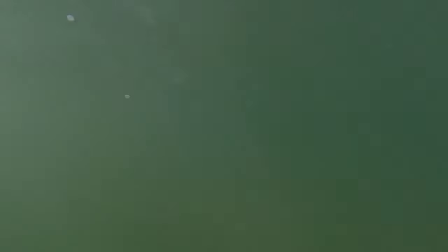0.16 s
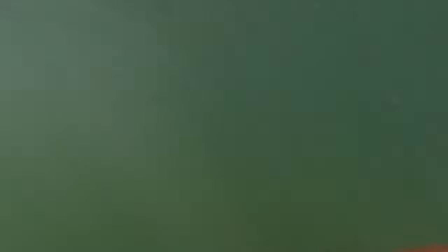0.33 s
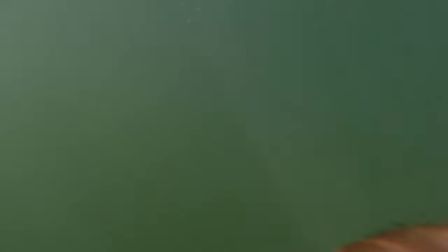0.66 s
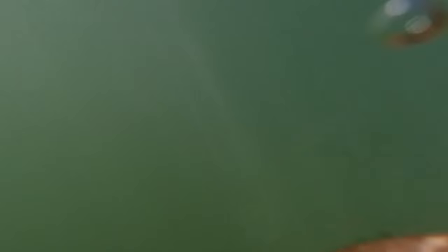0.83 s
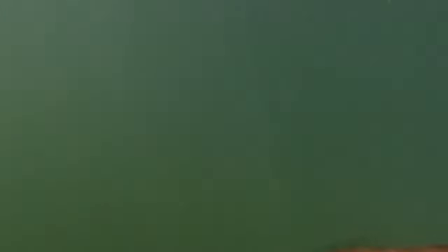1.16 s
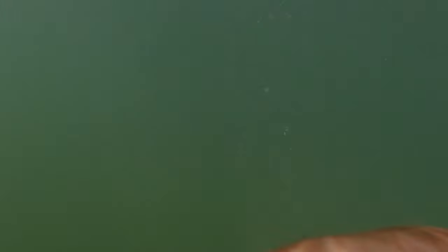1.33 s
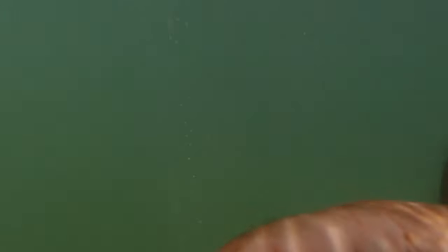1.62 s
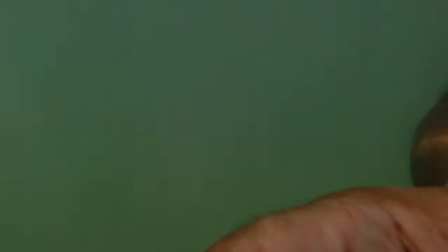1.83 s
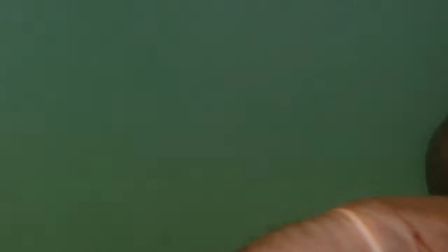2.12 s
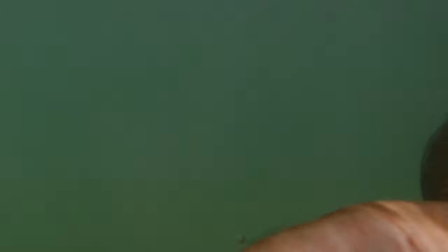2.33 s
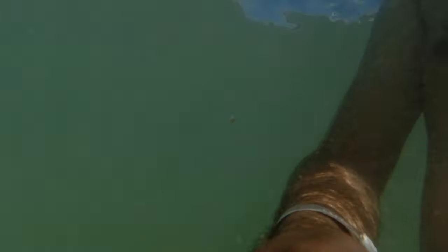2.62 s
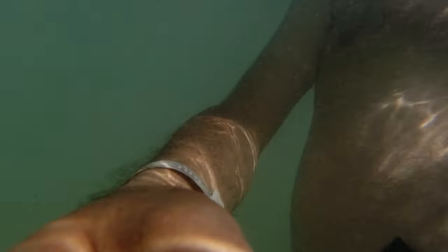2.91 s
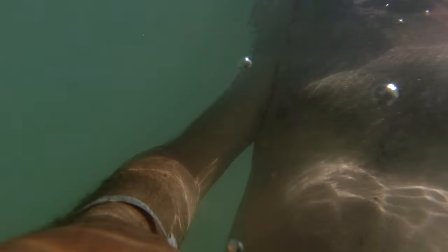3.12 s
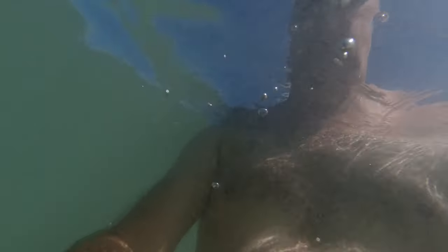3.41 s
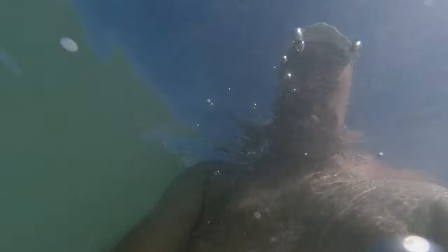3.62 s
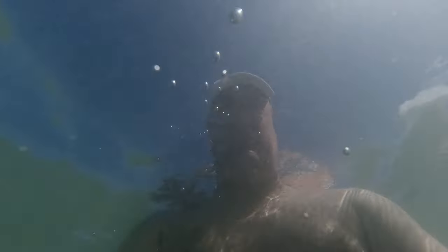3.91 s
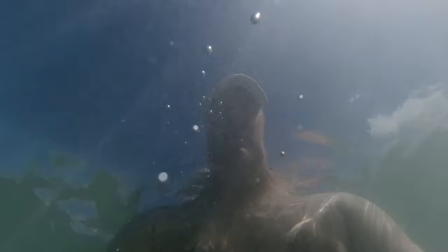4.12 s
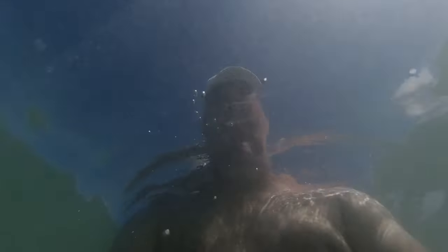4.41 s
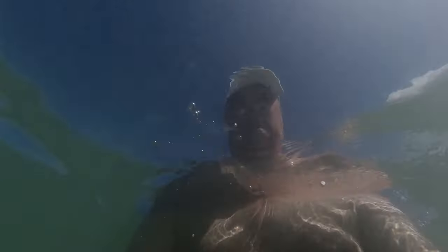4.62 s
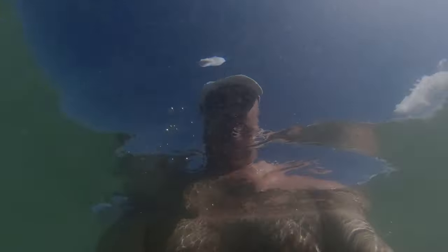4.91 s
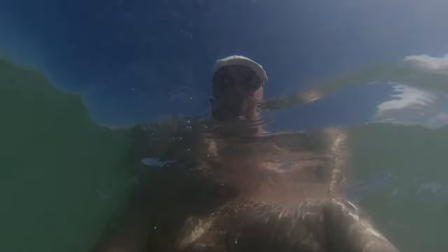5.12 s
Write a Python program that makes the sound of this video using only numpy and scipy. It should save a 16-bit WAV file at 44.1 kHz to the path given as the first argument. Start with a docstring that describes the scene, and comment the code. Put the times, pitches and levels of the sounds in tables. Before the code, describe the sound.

Muffled stereo sound just below the water surface. Rounded air bubbles pop and gurgle close to the camera case, alone or in quick clusters, amid uneven sloshing and deep turbulent rumble. Faint clicks and fine fizz brush the casing. The busiest burst comes past the middle; afterwards only weak trickles and a few soft plops remain.

```python
"""Air pockets break off a bather's hand and a waterproof camera case just under the surface and ring as bubbles:
damped sines near each pocket's own pitch, alone or in gushes, spurts and faint trickles.
Banded noise makes the water slosh and rumble round the case as it is turned over; fine bubbles fizz against it,
and short noise kicks through resonances make it tick from small knocks and bursting bubbles.
Two sound ports on the case give the left and right channels."""
import sys
import numpy as np
from scipy import signal
from scipy.io import wavfile
from scipy.ndimage import uniform_filter1d

SR = 44100
rng = np.random.default_rng(int(sys.argv[2]) if len(sys.argv) > 2 else 0)


def file_out(sig):
    """Save sig as 16-bit WAV at sys.argv[1]."""
    # one column per channel
    cols = np.atleast_2d(sig).T
    # limit, then scale
    lim = np.clip(cols, -1, 1)
    pcm = np.round(lim * 32767).astype(np.int16)
    wavfile.write(sys.argv[1], SR, pcm)


N = 232186
TIME = np.arange(N) / SR

# air pockets breaking away: (time near the peak [s], pitch [Hz], peak level [dB], decay time [ms],
# lag of the right port [ms])
BUBBLES = [(0.0275, 480, -13.5, 2.3, 0.43), (0.028, 840, -18, 2.6, 0.42), (0.082, 550, -12, 1.6, 0.5),
           (0.082, 1061.0, -26.0, 2.6, 0.67), (0.197, 600.0, -27, 2.2, 0.45), (0.198, 1000, -23, 5.0, 0.66),
           (0.25, 950, -35.5, 5.0, 0.4), (0.597, 470, -34, 5, 0.3), (1.297, 610.0, -22.0, 3.0, 0.3),
           (1.305, 610, -17.5, 7, 0.3), (1.337, 534.0, -30.0, 1.5, 0.5), (1.655, 632.0, -15.0, 2.6, -0.33),
           (1.655, 1201.0, -22.0, 2.0, 0.27), (1.977, 265.0, -21.5, 5.4, -1.5),
           (1.978, 1018.0, -24.5, 2.6, -0.21), (1.978, 1417.0, -34.0, 3.3, -0.07),
           (1.979, 659.0, -19.5, 2.6, 0.86), (2.008, 122.0, -26.5, 22.0, 2.0),
           (2.166, 440, -20.5, 3.3, 0.17), (2.184, 520, -23.5, 5, 0.23), (2.212, 254.0, -30.5, 5.4, -0.18),
           (2.443, 493.0, -29.5, 1.5, 0.32), (2.639, 1150, -27.0, 2.5, 0.34), (2.659, 500, -28, 5, 0.1),
           (2.676, 249.0, -24.5, 4.2, -0.32), (2.7225, 700, -22, 1.4, 0.16),
           (2.965, 619.0, -17.5, 1.5, 0.11), (2.965, 1933.0, -28.5, 2.4, 0.17),
           (2.98, 271.0, -18, 3.6, -0.51), (2.981, 701.0, -14.5, 3.3, 0.23), (3.015, 370, -23.5, 3.5, 0.2),
           (3.036, 1590, -48.0, 14.0, 0.1), (3.199, 255.0, -17.5, 8, 0.22), (3.253, 815, -24.5, 2.6, 0.0),
           (3.263, 855.0, -29.5, 10, -0.01), (3.278, 870, -23.5, 3.6, 0.38), (3.313, 1350, -35, 8, 0.18),
           (3.345, 710, -31, 10, -0.08), (3.345, 282.0, -17.5, 6, 0.1), (3.4075, 2150, -35, 2.2, 0.1),
           (3.4235, 271.0, -11.5, 4.0, 0.11), (3.424, 1252.0, -25.0, 1.5, -0.05),
           (3.435, 319.0, -9.5, 1.5, 1.38), (3.435, 950, -25, 2, 0.1), (3.44, 90.0, -19, 16.0, 2.0),
           (3.453, 900, -15.5, 1.0, -0.16), (3.454, 1400, -28, 2.5, -0.1), (3.456, 1110, -20.5, 4, -0.16),
           (3.461, 401.0, -17.5, 2.6, 0.38), (3.501, 313.0, -22.0, 5.5, 0.21),
           (3.515, 976.0, -34, 20, -0.02), (3.576, 347.0, -26.5, 7.0, -0.01),
           (3.578, 1025, -27.0, 6, -0.08), (3.67, 454.0, -20.0, 3.3, 0.02),
           (3.674, 607.0, -18.0, 5.4, -0.53), (3.682, 362.0, -21.0, 9.0, -0.04),
           (3.69, 1010, -25.5, 7.0, -0.06), (3.862, 590, -28, 6, 0.38), (3.881, 450, -23.5, 6, 0.59),
           (3.8935, 270, -21, 1.8, -0.75), (4.414, 362.0, -31.5, 1.5, 0.11),
           (4.528, 276.0, -32.5, 7.0, -0.13), (5.1355, 345, -19.5, 2.4, -0.04),
           (5.136, 620.0, -23.5, 2.6, -0.64), (5.15, 350, -23.5, 2.8, 0.0), (5.1505, 560, -25, 1.8, -0.1)]
# short ticks on the case, from small knocks or bursting bubbles:
# (time [s], peak level of the ringing part [dB], ring frequency [Hz])
TICKS = [(0.026, -47, 1610), (0.741, -54.5, 3100), (0.7712, -54, 3330), (1.6527, -49, 2510),
         (1.694, -55, 2970), (1.8985, -53, 3300), (1.975, -33.5, 3200), (2.0912, -44.5, 2210),
         (2.321, -44, 3200), (2.627, -47, 3190), (2.96, -31, 3000), (2.9758, -29.5, 3446),
         (3.345, -41, 3050), (3.4198, -34, 2298), (3.433, -33.5, 3137), (3.462, -41, 3060),
         (3.669, -36.5, 1900), (4.046, -50.5, 2850), (4.2626, -58, 3240), (4.468, -56, 2760),
         (4.8957, -54.5, 3570), (5.176, -49, 2980)]


def from_db(db):
    """Amplitude ratio from the logarithmic level in decibels."""
    return 10 ** (np.asarray(db) / 20)


def rms_one(x):
    """Normalisation to unit root-mean-square amplitude."""
    return x / np.sqrt(np.mean(x ** 2) + 1e-20)


def in_time(points):
    """Linear interpolation of a curve over time."""
    s, value = np.transpose(points)
    return np.interp(TIME, s, value)


def at_hz(points, hz):
    """Interpolation of a spectrum on a logarithmic frequency axis."""
    f, value = np.transpose(points)
    return np.interp(np.log(hz), np.log(f), value)


def drift(rate_hz):
    """Random fluctuation: white noise through two equal real poles, with spread 1."""
    step = 40   # samples between the points of the slow signal
    pole = np.exp(-2 * np.pi * rate_hz * step / SR)
    kicks = rng.standard_normal(N // step + 2002)
    slow = signal.lfilter([1], [1, -2 * pole, pole * pole], kicks)[2000:]   # skip the settling
    return np.interp(np.arange(N) / step, np.arange(len(slow)), rms_one(slow))


def butter(x, hz, kind, order=2):
    """Causal Butterworth filter: a maximally flat passband."""
    sos = signal.butter(order, np.clip(hz, 8, .45 * SR), kind, fs=SR, output="sos")
    return signal.sosfilt(sos, x + 1e-18)


def resonate(x, hz, width_hz):
    """Damped resonance as a pole pair, with about unit gain at its peak."""
    r = np.exp(-np.pi * width_hz / SR)
    zeros = np.array([1, 0, -1]) * (1 - r * r) / 2
    poles = [1, -2 * r * np.cos(2 * np.pi * hz / SR), r * r]
    return signal.lfilter(zeros, poles, x + 1e-18)


def grains(per_s, spread_db):
    """Random impulse process: two unrelated trains of kicks, a few much larger than the rest."""
    size_db = spread_db * np.minimum(rng.exponential(1, (2, N)), 4)
    kicks = from_db(size_db) * rng.choice([-1, 1], (2, N))
    return rms_one(kicks * (rng.random((2, N)) < per_s / SR))


def coloured(drives, spectrum, low_hz, count, patchy_db, patchy_rate):
    """Third-octave synthesis: bands surge independently, with set coherence between ports; rms 1."""
    # how alike the two ports hear the water: (frequency [Hz], correlation [-1 to 1])
    likeness = [(30, 0.35), (90, -0.36), (220, 0.63), (450, -0.16), (750, -0.014), (1400, 0.16),
                (3000, -0.026)]
    out = 0
    for k in range(count):
        hz = low_hz * 2 ** (k / 3)
        edges_hz = hz * 2 ** (np.array([-1, 1]) / 6)
        mid, side = butter(drives[k % len(drives)], edges_hz, "band")
        alike = np.clip(at_hz(likeness, hz), -1, 1)
        gain = from_db(at_hz(spectrum, hz) + patchy_db * drift(patchy_rate))
        both_ports = np.sqrt(1 + alike) * mid + np.sqrt(1 - alike) * side * [[1], [-1]]
        out = out + gain * both_ports
    return rms_one(out)


def ports(pair, lag=4):
    """Propagation delay: the right port hears the left signal a few samples late, slightly changed."""
    return np.array([pair[0], .85 * np.roll(pair[0], lag) + .5 * pair[1]])


def add_bubble(out, s, hz, db, swell_ms, decay_ms, lag_ms, wobble=0.027, rise_per_cycle=0.0024):
    """Damped oscillator: an air pocket swells into ringing, wavers, creeps up in pitch and fades."""
    tail_db, tail_cycles = -33, 24   # faint after-ring: level, decay time in cycles (500 Hz or above)
    tail_ms = 1000 * tail_cycles / max(hz, 500)
    reach_s = np.array([-swell_ms, max(decay_ms, tail_ms)]) / 100   # ten time constants each way
    first, last = np.clip((SR * (s + reach_s)).astype(int), 0, N)
    if last - first < 2:
        return
    t = TIME[first:last] - s
    # smooth joint of an exponential rise and an exponential fall
    blip, tail = (np.exp(-np.logaddexp(-t * 1000 / swell_ms, t * 1000 / fall_ms))
                  for fall_ms in (decay_ms, tail_ms))
    envelope = blip + from_db(tail_db) * tail
    waver = wobble * np.sin(2 * np.pi * (t * hz / 10 + rng.random()))   # slow shape oscillation
    pitch = hz * np.exp(rise_per_cycle * 10 * np.tanh(t * hz / 10) + waver)
    tone = np.sin(2 * np.pi * (np.cumsum(pitch) / SR + rng.random()))
    ring = from_db(db) * envelope / envelope.max() * tone
    for port, sign in enumerate((1, -1)):   # half the lag early on the left, half late on the right
        out[port, first:last] += np.interp(t + sign * lag_ms / 2000, t, ring, left=0, right=0)


def wakes(events, attack_s, release_s):
    """Power addition: the disturbance round each event (s, dB) builds up and dies exponentially."""
    power = np.zeros(N)
    for s, db in events:
        near = slice(max(int(s * SR) - SR // 10, 0), int(s * SR) + SR // 4)
        t = TIME[near] - s
        shape = np.exp(-np.maximum(-t / attack_s, t / release_s))
        power[near] += (from_db(db) * shape) ** 2
    return power


def disturbed(curve, power):
    """Energy sum of a slow level curve and the wakes, as a level in dB."""
    return 10 * np.log10(from_db(in_time(curve)) ** 2 + power)


def wake_strengths():
    """Source strength of each bubble's wake: bubbles pitched below 600 Hz stir up less."""
    return [(s, db + 30 * np.log10(min(hz / 600, 1))) for s, hz, db, *rest in BUBBLES]


def stir_level():
    """Superposed agitation: slow stirring plus a brief wake of slosh round each large bubble."""
    # stirring between the large bubbles: (time [s], slosh level before trim and case [dB])
    stirring = [(0.0, -51), (0.37, -52), (0.52, -41), (0.68, -40), (0.73, -44.5), (1.11, -48), (1.35, -38),
                (1.49, -51.5), (1.63, -39), (1.81, -51.5), (2.09, -36), (2.21, -38.5), (2.28, -59),
                (2.49, -60), (2.56, -40), (2.66, -32), (2.75, -44), (2.94, -40.5), (3.01, -30.5),
                (3.15, -35), (3.45, -36.5), (3.8, -44.5), (4.23, -52.5), (5.26, -52)]
    wake_db = -19.5   # relative to the bubble's wake strength
    stirs = [(s, db + wake_db) for s, db in wake_strengths()]
    return disturbed(stirring, wakes(stirs, attack_s=.003, release_s=.02))


def froth_level():
    """Superposed agitation: slow froth plus the fizz that bubbles and ticks shake off the case."""
    # fine bubbles on the case: (time [s], fizz level before trim and case [dB])
    froth = [(0.0, -96.5), (0.63, -79.5), (1.53, -84.5), (1.59, -71.5), (1.79, -88), (2.11, -61),
             (2.24, -89), (2.44, -69.5), (2.5, -86), (2.57, -72), (2.73, -76.5), (3.11, -63.5), (3.64, -80),
             (4.64, -83.5), (5.26, -73.5)]
    bubble_db, tick_db = -71.5, -17   # relative to the wake strength and to the tick's peak
    shakes = [(s, db + bubble_db) for s, db in wake_strengths()]
    shakes += [(s, db + tick_db) for s, db, hz in TICKS]
    return disturbed(froth, wakes(shakes, attack_s=0.0067, release_s=0.0043))


def case(x):
    """Resonant filtering: each resonance of the case lifts, and each hollow cuts, its own band."""
    # resonances and the hollows between them: (centre [Hz], width [Hz], gain [dB])
    modes = [(249, 51, 7), (313.5, 86, -6.5), (437, 20, 3), (886, 220, -12), (1200, 440, 1.5),
             (1910, 1000, -6.5), (2244, 32, 9), (2660, 350, -6), (2820, 110, 1.5)]
    for hz, width_hz, db in modes:
        half = np.pi * width_hz / SR
        root = from_db(db / 2)
        turn = -2 * np.cos(2 * np.pi * hz / SR)
        zeros = [1 + half * root, turn, 1 - half * root]
        poles = [1 + half / root, turn, 1 - half / root]
        x = signal.lfilter(zeros, poles, x)
    return x


def hiss(level_db=-99):
    """White noise: a faint, flat spectrum, independent in the two channels."""
    return from_db(level_db) * rng.standard_normal((2, N))


def rumble(trim_db=-6.5):
    """Turbulent pressure: eddies press partly separately on the ports, with the strength of the flow."""
    # flow round the case as it is moved: (time [s], rumble level before trim [dB])
    flow = [(0.0, -39.5), (0.52, -36), (0.75, -40.5), (1.12, -38), (1.2, -26), (1.51, -29), (2.02, -26),
            (2.4, -37), (2.56, -26), (2.72, -25), (2.92, -18), (3.3, -23), (3.44, -14), (3.54, -29),
            (3.68, -23), (4.22, -38.5), (4.41, -33), (5.2, -34), (5.26, -37.5)]
    # shape of the rumble: (frequency [Hz], relative level [dB per Hz])
    spectrum = [(16, -4), (34, 0.5), (55, -10.5), (110, -14.5), (170, -21), (260, -33)]
    eddies = rng.standard_normal((2, 2, N))
    noise = coloured(eddies, spectrum, 20, count=12, patchy_db=2.5, patchy_rate=6)
    running_power = uniform_filter1d(np.mean(noise ** 2, axis=0), size=SR // 6)
    steady = noise / np.sqrt(running_power)
    return from_db(in_time(flow) + trim_db + 2 * drift(24)) * steady


def slosh(level_db, trim_db=-1.0):
    """Shot noise: water folds over in hundreds of quickly damped gurgles a second, coming in gulps."""
    # shape of the slosh: (frequency [Hz], relative level [dB per Hz])
    spectrum = [(70, -15.5), (120, 1.5), (220, -4), (460, 2), (680, -1), (900, -4.5), (1170, -15.5),
                (1650, -28.5), (2250, -31), (3200, -43.5)]
    gulps = from_db(3 * drift(20))
    drives = [gulps * grains(260, 3) for k in range(6)]
    water = coloured(drives, spectrum, 72, count=18, patchy_db=2.0, patchy_rate=14)
    return from_db(level_db + trim_db) * butter(water, 3600, "low", order=6)


def churn(level_db, count=480, over_db=-1.0, centre_hz=520, spread_octaves=.6, cycles=1.6):
    """Air entrainment: stirred water keeps trapping small bubbles, louder the harder it moves."""
    out = np.zeros((2, N))
    starts = rng.integers(0, N, count)
    for at, (size, strength, place) in zip(starts, rng.standard_normal((count, 3))):
        octaves = spread_octaves * size
        hz = centre_hz * 2 ** octaves
        muffle_db = 7 * max(octaves, 0)   # the case muffles the high ones
        db = level_db[at] + over_db + 2 * min(strength, 1) - muffle_db
        add_bubble(out, at / SR, hz, db, 400 / hz, 1000 * cycles / hz, .5 * place)
    return out


def trickle(count=150, top_db=-51.0, fall_db_per_octave=8.0, cycles=9):
    """Lightly damped resonance: stray bubbles further off ring clearly but faintly, the smaller the fainter."""
    out = np.zeros((2, N))
    for when, size, strength, place in rng.random((count, 4)):
        octaves = 3.2 * size
        hz = 420 * 2 ** octaves
        db = top_db - fall_db_per_octave * octaves - 10 * strength
        add_bubble(out, when * N / SR, hz, db, 400 / hz, 1000 * cycles / hz, place - .5)
    return out


def fizz(level_db, trim_db=5.0):
    """Shot noise in bands: fine bubbles prickle on the case in flurries, each size on its own."""
    # shape of the fizz: (frequency [Hz], relative level [dB per Hz])
    spectrum = [(1200, -5.5), (1800, -4.5), (2300, 0), (3100, 0.5), (3900, -17), (4800, -19.5),
                (6000, -32.5)]
    drives = [from_db(3 * drift(30)) * grains(450, 3.5) for k in range(8)]
    prickle = coloured(drives, spectrum, 1250, count=8, patchy_db=2, patchy_rate=10)
    return from_db(level_db + trim_db) * prickle


def ticks(decay_s=0.0022, width_hz=620, after_db=-17, after_s=0.015, body_db=-5.0, crack_db=-12.5):
    """Impulsive excitation: a knock or bursting bubble makes the wall ring; weak ticks are duller."""
    out = np.zeros((2, N))
    t = TIME[:SR // 20]
    decay = np.exp(-t / decay_s) + from_db(after_db) * np.exp(-t / after_s)
    envelope = decay * np.tanh(2 * t / decay_s)
    hardest_db = max(db for s, db, hz in TICKS)
    for s, db, hz in TICKS:
        softness_db = db - hardest_db   # 0 for the hardest, negative for the rest
        kick = ports(rng.standard_normal((2, len(t)))) * envelope
        muffled = butter(kick, max(6300 + 130 * softness_db, 4200), "low", order=12)
        ring = resonate(resonate(muffled, hz, width_hz), hz, width_hz)
        body = butter(muffled, 1300, "high")
        crack = butter(kick, 7300, "high", order=4)
        parts = ((ring, 0), (body, body_db), (crack, crack_db + 3 * softness_db))
        tick = sum(from_db(db + part_db) * part / np.abs(part).max() for part, part_db in parts)
        at = round(s * SR)
        out[:, at:at + len(t)] += tick[:, :N - at]
    return out


def spurts(width_share=0.24):
    """Narrow-band noise: air squeezed through a gap breaks into a quick stream of like-sized bubbles."""
    # spurts: (middle time [s], pitch [Hz], rms level at the middle [dB], Gaussian half-length [s])
    streams = [(0.66, 2230, -69, 0.048), (1.955, 3330, -60, 0.021), (1.972, 4570, -59, 0.015),
               (2.09, 4250, -67, 0.029), (2.561, 2950, -56.5, 0.0071), (2.64, 4130, -47, 0.0028),
               (2.967, 4570, -41.5, 0.0062), (3.12, 3150, -51, 0.0155), (3.257, 5000, -60, 0.017),
               (3.271, 3170, -48, 0.0096), (3.423, 4600, -39, 0.001), (3.673, 4540, -39, 0.0037),
               (3.685, 4460, -55, 0.012)]
    stream = ports(grains(2900, 1.8))
    out = np.zeros((2, N))
    for s, hz, db, length in streams:
        edges_hz = hz * (1 + width_share * np.array([-.5, .5]))
        band = rms_one(butter(stream, edges_hz, "band", order=3))
        out += from_db(db) * np.exp(-.5 * ((TIME - s) / length) ** 2) * band
    return out


def gushes(per_s=900, spread_octaves=0.63, cycles=2.3):
    """Fragmentation: a shattering air pocket gives a ragged run of mixed plops, muffled by the case."""
    # gushes: (middle time [s], middle pitch [Hz], plop level before muffling [dB], spread in time [s])
    pockets = [(0.028, 708, -32.5, 0.012), (0.09, 784, -35.5, 0.015), (0.204, 926, -34.5, 0.013),
               (0.52, 470, -44.5, 0.024), (0.665, 560, -43, .018), (1.975, 675, -34.5, .013),
               (2.094, 592, -37.5, .006), (2.17, 495, -35, .016), (3.017, 556, -34, .005),
               (3.345, 720, -38, 0.013), (3.447, 1160, -27.5, 0.015), (3.678, 595, -33, 0.0085)]
    out = np.zeros((2, N))
    for s, hz, db, length in pockets:
        for late, size, strength in rng.standard_normal((int(per_s * 2 * length), 3)):
            pitch = hz * 2 ** (spread_octaves * np.tanh(size))
            plop_db = db + strength - 2 * abs(late)
            add_bubble(out, s + length * late, pitch, plop_db, 400 / pitch, 1000 * cycles / pitch, .4)
    return butter(out, 1300, "low", order=6)


def bubbles(count=9, shed_db=-17.0, shed_s=.011, lead_s=0.00395, spread_octaves=0.45, shed_cycles=2.3,
            muffle_hz=1150, swell_share=0.39):
    """Volume resonance: each large bubble rings and sheds weaker ones of nearby pitch, the high ones muffled."""
    out = np.zeros((2, N))
    for s, hz, db, decay_ms, lag_ms in BUBBLES:
        add_bubble(out, s, hz, db, swell_share * decay_ms, decay_ms, lag_ms)
        for late, size, strength in rng.standard_normal((count, 3)):
            pitch = hz * 2 ** (spread_octaves * np.clip(size, -1, 1))
            muffle_db = 10 * np.log10(1 + (pitch / muffle_hz) ** 8)   # by the case
            small_db = db + shed_db + 2 * strength - 4 * abs(late) - muffle_db
            start = s - lead_s + shed_s * abs(late)
            add_bubble(out, start, pitch, small_db, 400 / pitch, 1000 * shed_cycles / pitch, lag_ms)
    return out


def scene():
    """Superposition of bubbles, gushes, spurts and ticks on the water they stir up, and a faint hiss."""
    stir_db = stir_level()
    through_case = slosh(stir_db) + churn(stir_db) + trickle() + fizz(froth_level())
    water = rumble() + case(through_case)
    return bubbles() + gushes() + spurts() + ticks() + water + hiss()


def record(dry):
    """Band limiting: a steep low-pass holds everything above 15.5 kHz at least 70 dB down."""
    return signal.sosfilt(signal.cheby2(12, 70, 15500, fs=SR, output="sos"), dry)


dry = scene()
out = record(dry)
file_out(out)
```